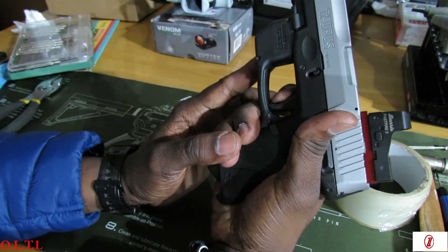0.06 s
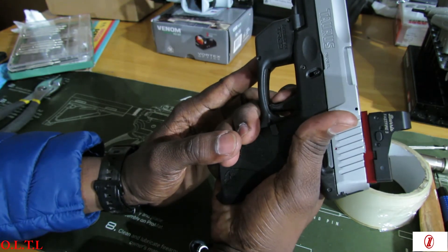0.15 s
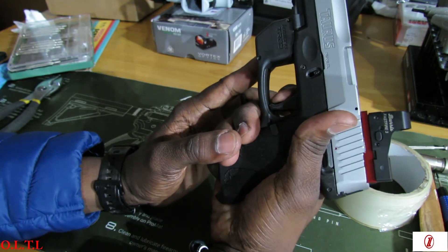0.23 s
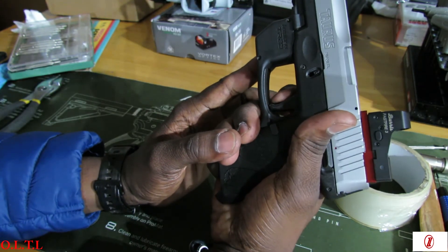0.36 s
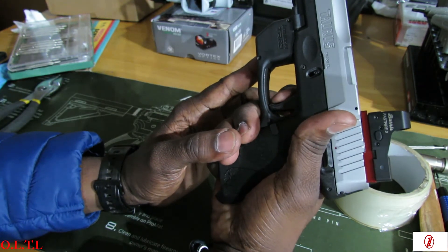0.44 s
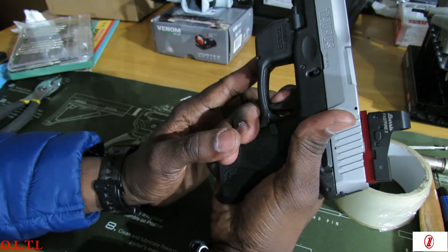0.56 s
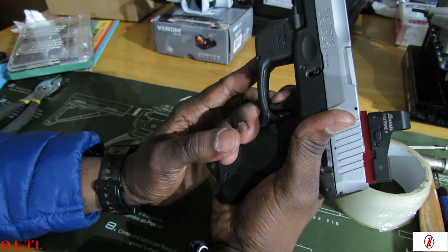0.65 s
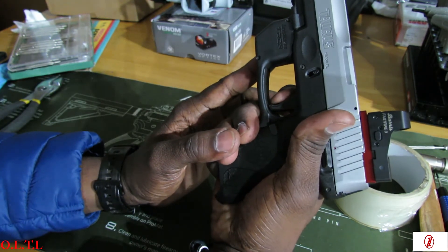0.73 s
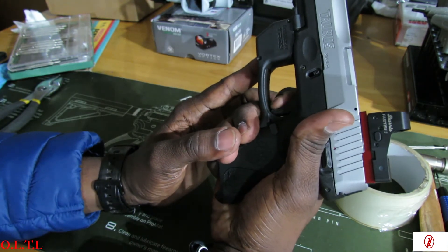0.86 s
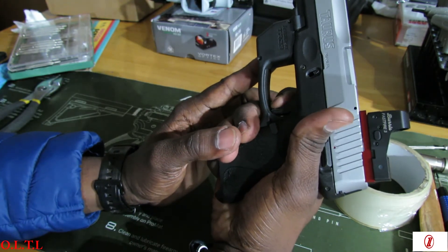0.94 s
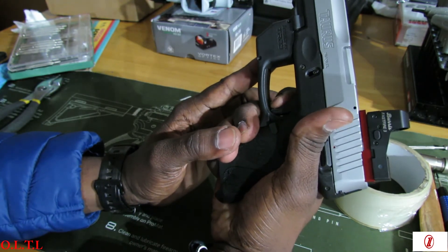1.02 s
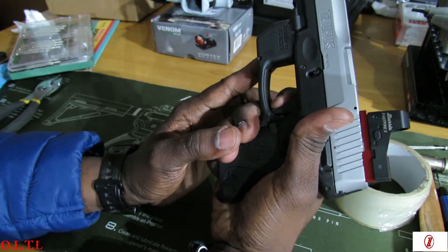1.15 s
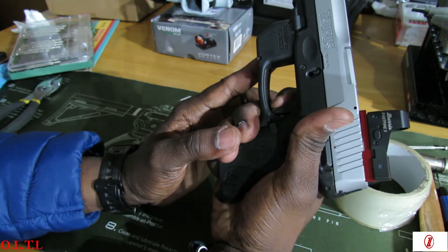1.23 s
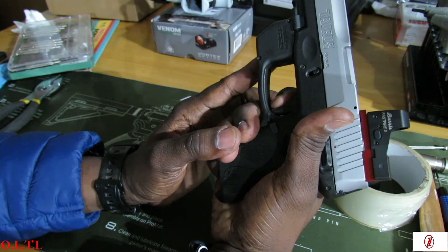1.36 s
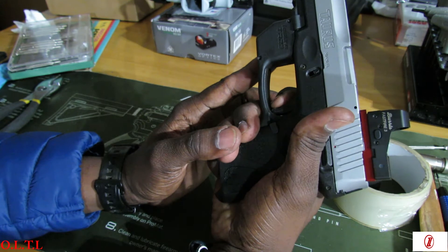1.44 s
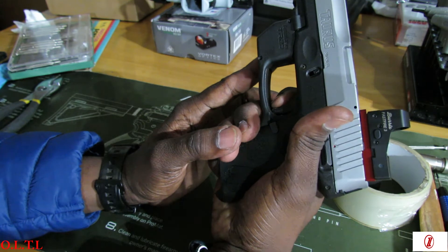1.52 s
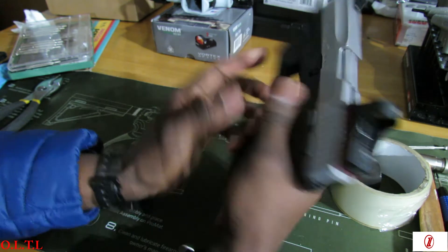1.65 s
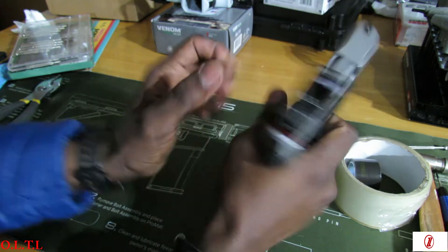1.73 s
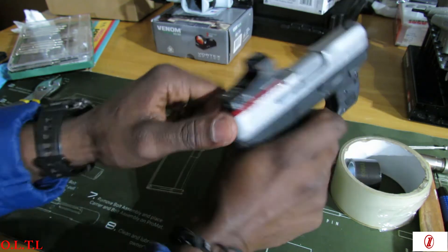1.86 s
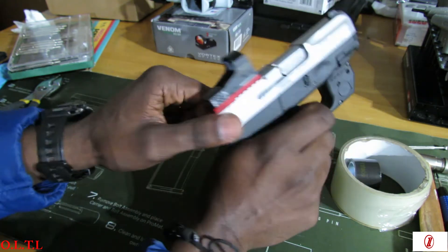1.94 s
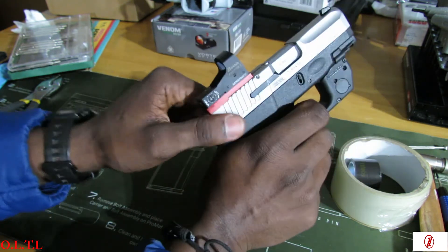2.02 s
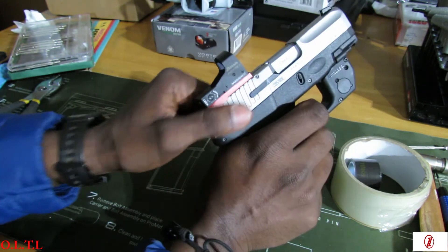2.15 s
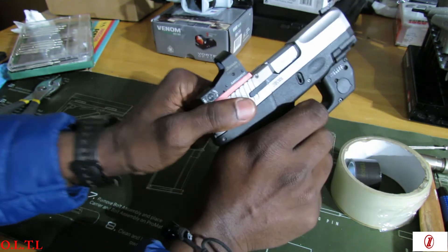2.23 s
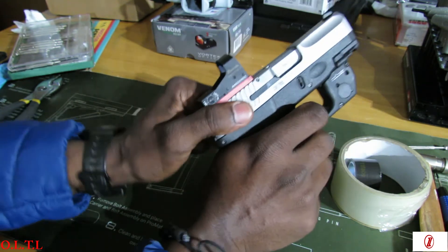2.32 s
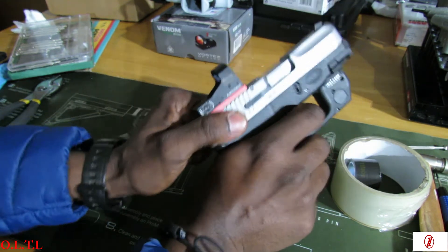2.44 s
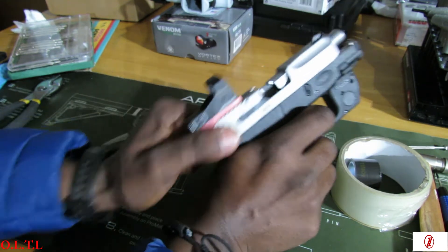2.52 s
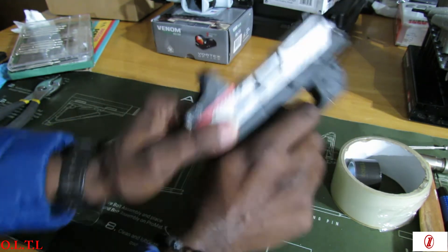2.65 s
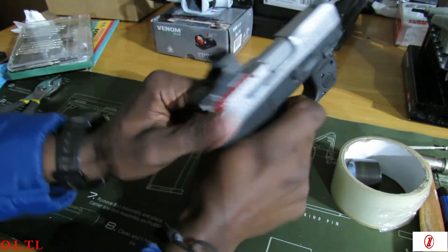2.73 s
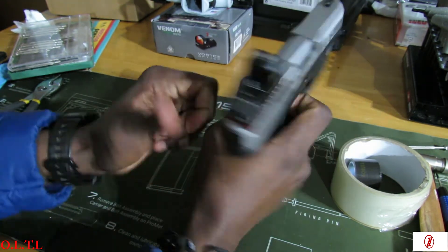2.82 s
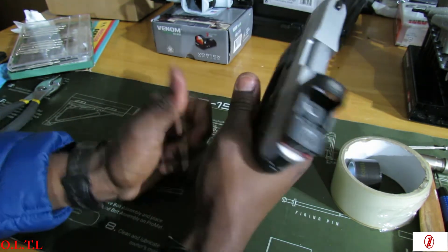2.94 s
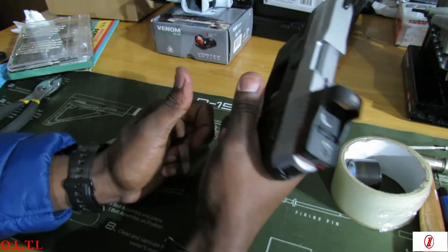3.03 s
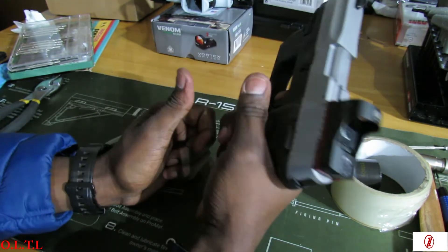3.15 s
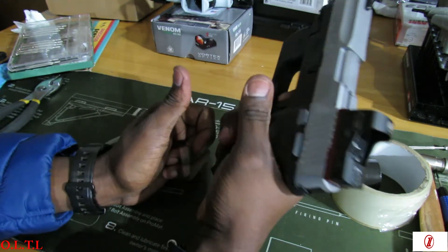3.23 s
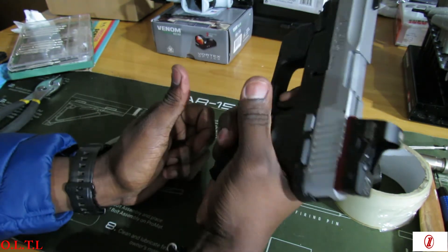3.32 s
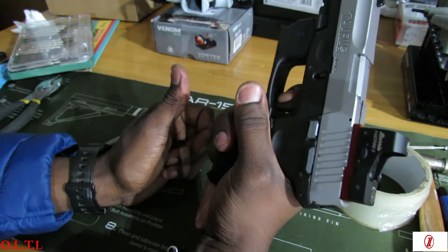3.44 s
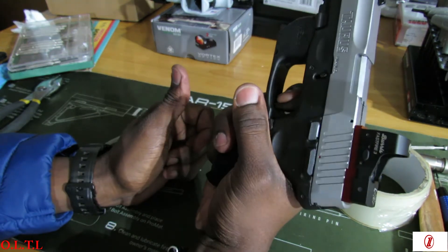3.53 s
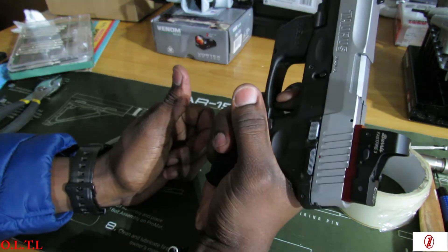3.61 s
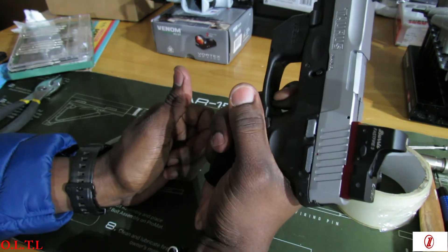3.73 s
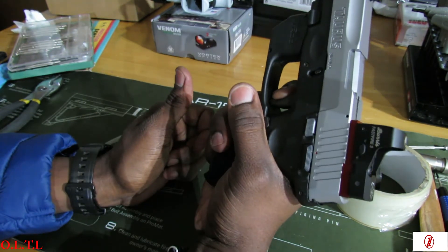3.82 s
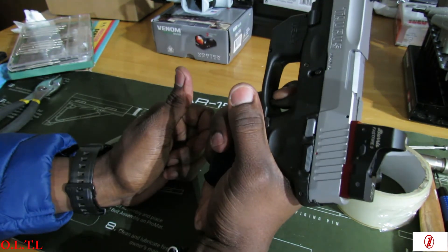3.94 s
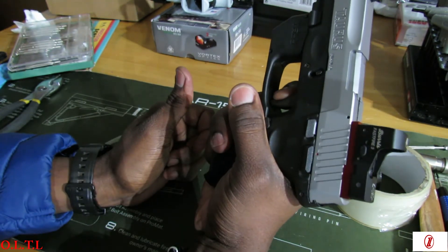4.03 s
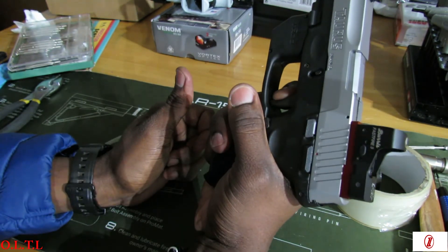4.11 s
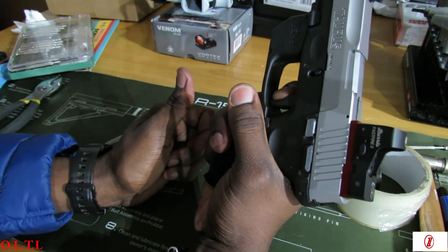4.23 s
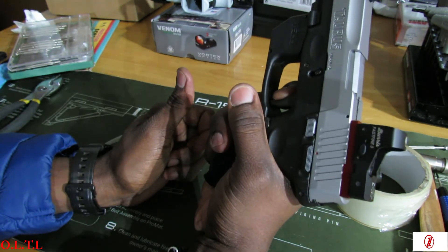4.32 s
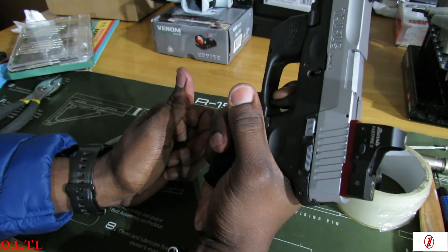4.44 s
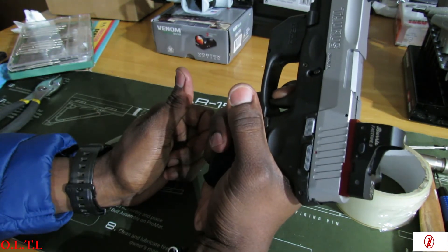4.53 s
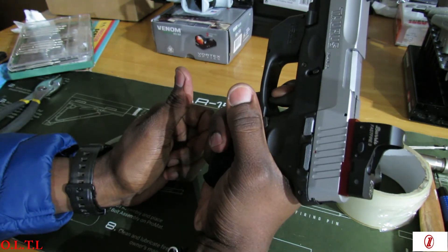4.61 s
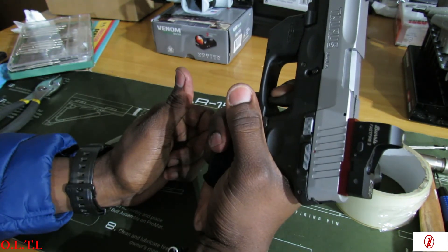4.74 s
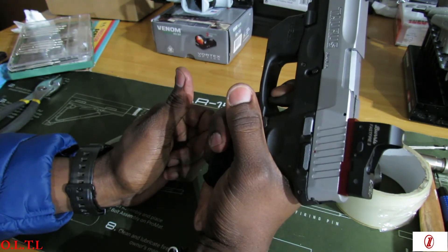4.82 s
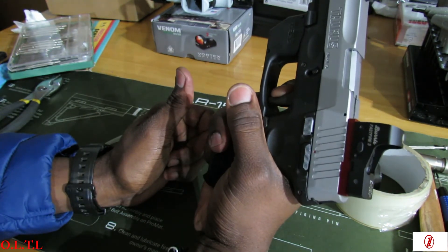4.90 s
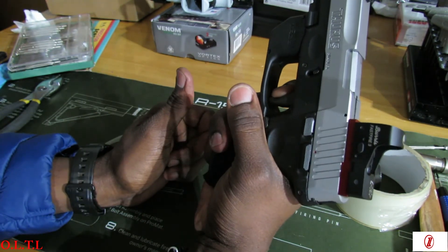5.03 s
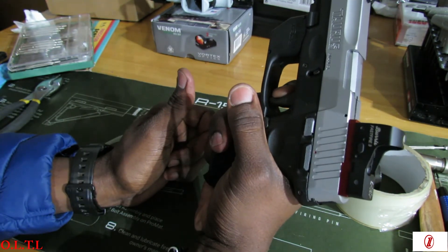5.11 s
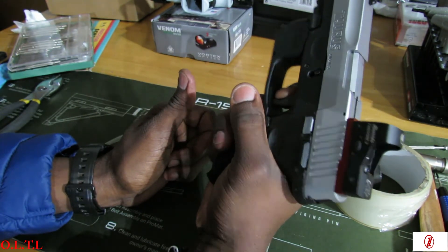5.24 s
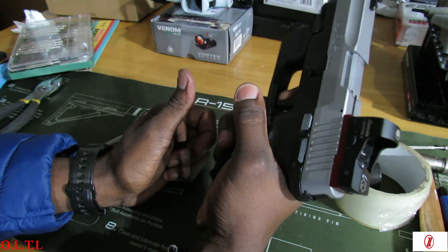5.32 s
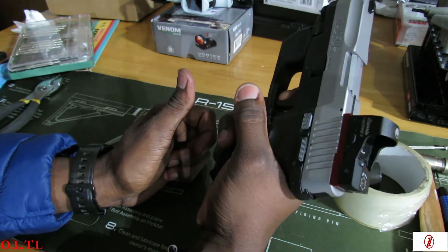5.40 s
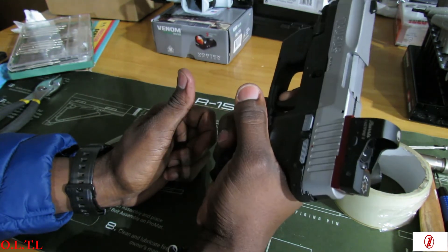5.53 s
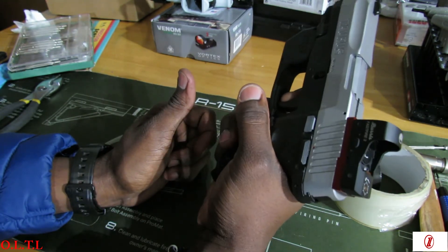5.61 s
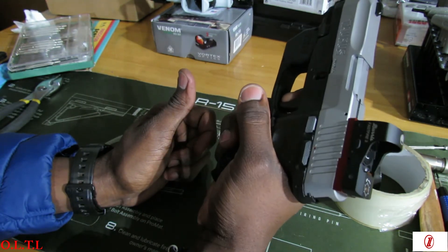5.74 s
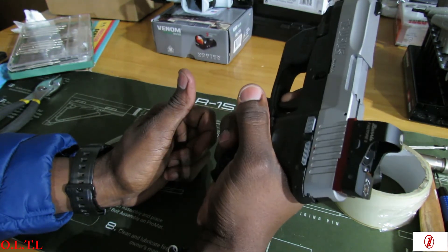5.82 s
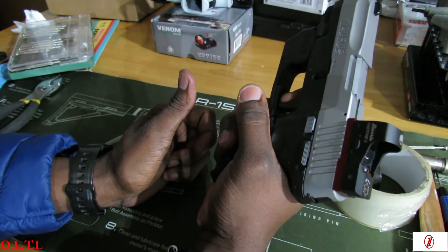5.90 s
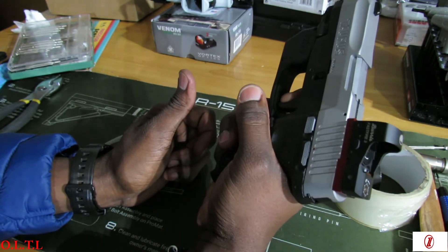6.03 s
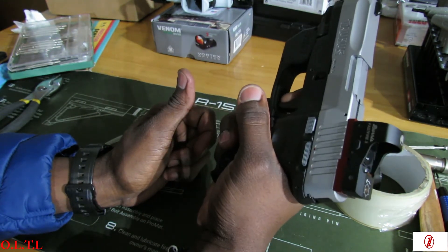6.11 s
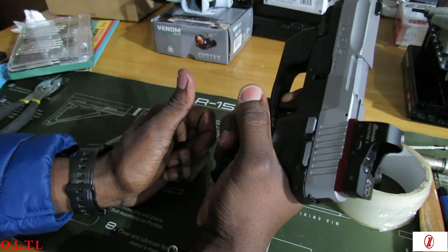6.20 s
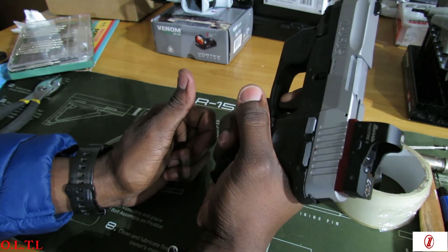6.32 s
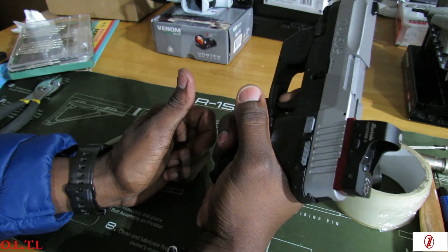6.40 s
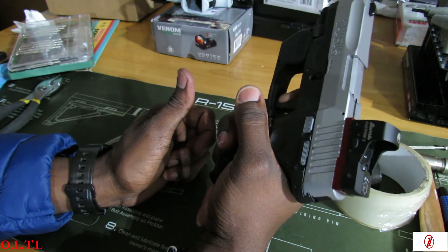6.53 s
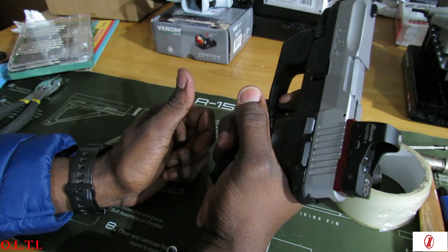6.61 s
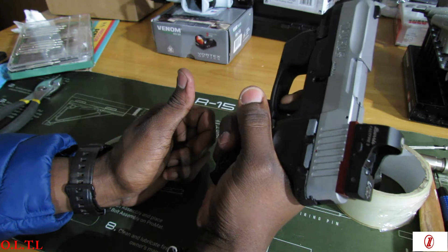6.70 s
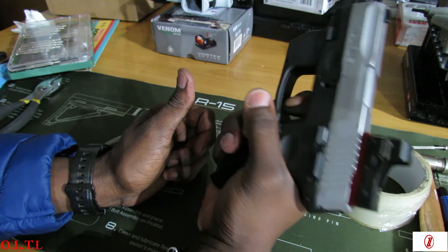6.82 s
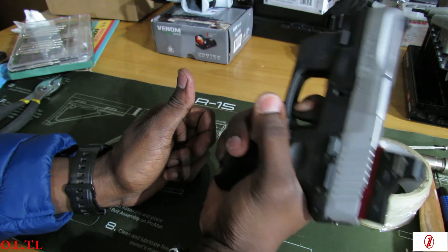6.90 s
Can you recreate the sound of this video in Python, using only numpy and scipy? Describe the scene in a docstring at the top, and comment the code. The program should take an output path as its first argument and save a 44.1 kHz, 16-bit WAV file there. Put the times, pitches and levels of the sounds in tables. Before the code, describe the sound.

In a small humming room, an unloaded pistol's trigger snaps once, hands rub the grip, the slide is racked hard, then the trigger resets.

```python
"""Over a fan's hum in a small room, an unloaded pistol is dry-fired: a faint noise leads in, the sear lets go,
then the striker lands and bounces, as noise cracks over ringing modes. Hands rub the grip (grainy friction
noise) and bump it; the slide is racked in double blows; small parts tick and tap; the trigger is let out to
its reset. Late on, a nylon sleeve sweeps past on the left and its folds snap. Room noise answers each sound.
A gain control ducks at the loud snaps and lets the room noise creep back."""
import sys
import numpy as np
from scipy import signal
from scipy.fft import rfft, irfft, next_fast_len
from scipy.io import wavfile
from scipy.ndimage import uniform_filter1d, minimum_filter1d, map_coordinates

SR = 44100
rng = np.random.default_rng(int(sys.argv[2]) if len(sys.argv) > 2 else 0)


def to_wav(sig):
    """Store sig (one row per channel, or 1-D mono) as 16-bit WAV at the path in sys.argv[1].

    Samples outside -1..1 are clipped; the rate is SR.
    """
    pcm = np.clip(np.atleast_2d(sig), -1, 1) * 32767
    pcm = np.round(pcm).astype(np.int16)
    wavfile.write(sys.argv[1], SR, pcm.T)  # frames by channels


N = 306881  # length in samples

# ringing modes of the trigger's connector: (f/Hz, relative level/dB, t60/s)
CONNECTOR_MODES = [(2240, -15, 0.052), (4200, -0.5, 0.006), (4790, 1.5, 0.012), (5350, -1, 0.007),
                   (5950, -14, 0.0091), (8860, -2, .012), (10500, 4, 0.014), (11650, 2, 0.013),
                   (12120, 1.5, 0.014)]


def amp(db):
    """Decibels to gain."""
    return 10 ** (np.asarray(db) / 20)


def unit(x):
    """Scaled to rms 1."""
    return x / np.sqrt(np.mean(x ** 2) + 1e-20)


def along(points, hz):
    """(f/Hz, value) points read on a log frequency axis."""
    f, value = np.transpose(points)
    return np.interp(np.log(hz + 1), np.log(f + 1), value)


def fade(t, t60):
    """Exponential decay by 60 dB in t60 seconds."""
    return np.exp(-np.log(1000) * t / t60)


def wobble(rate):
    """A smooth random curve with rate knots a second."""
    knots = rng.standard_normal(int(N * rate / SR) + 4)
    return map_coordinates(knots, [np.arange(N) * rate / SR])


def noise(spectrum, alike, size):
    """Coloured stereo noise of rms 1; alike lists (f/Hz, left-right likeness)."""
    hz = np.fft.rfftfreq(size, 1 / SR)
    # the likeness sets how the noise is shared between mid and side
    turn = np.arccos(np.clip(along(alike, hz), -1, 1)) / 2
    coloured = rfft(rng.standard_normal((2, size))) * amp(along(spectrum, hz))
    mid, side = irfft(coloured * [np.cos(turn), np.sin(turn)], size)
    return unit(np.array([mid + side, mid - side]))


def pan(db):
    """Left and right gains for a left-minus-right level in dB."""
    return amp([[db / 2], [-db / 2]])


def add(track, s, sound):
    """Mix a sound into the track from time s in seconds."""
    part = track[:, round(s * SR):][:, :sound.shape[1]]
    part += sound[:, :part.shape[1]]


def strokes(rows, rise):
    """Gain of rubbing strokes: each swells, rounds off and dies away exponentially; rise is the swell's share."""
    s, db, length = np.transpose(rows)[:, :, None]
    t = np.arange(N) / SR - s
    away = t / (length * np.where(t < 0, rise, 1 - rise))
    # overlapping strokes add in power
    return np.linalg.norm(amp(db) * np.exp(1 - np.hypot(1, away)), axis=0)


def rub(force, surface, grain_db, grain_rate):
    """Fine friction hiss whose strength catches and slips."""
    hiss = noise(surface, [(3000, 0.3155)], N)
    return force * unit(hiss * amp(grain_db * wobble(grain_rate)))


def ring(modes, t, scatter_db, spread):
    """Damped modes, struck at random strengths; each has a slightly different phase on either side."""
    hz, db, t60 = np.transpose(modes)[:, :, None]
    phase = rng.uniform(0, 2 * np.pi, hz.shape) + spread * rng.standard_normal((2, *hz.shape))
    strength = amp(db + scatter_db * rng.standard_normal(hz.shape)) / np.linalg.norm(amp(db))
    return np.sum(strength * fade(t, t60) * np.sin(2 * np.pi * hz * t + phase), axis=1)


def contacts(steel, times, crack_db, crack_t60, frame_db, steel_db, thud_db):
    """Steel on steel: a brief crack and, in dB re the crack, the polymer frame's knock, a steel ping and a thud."""
    # spectra of the steel's crack, the frame's knock and the thud in the hand: (f/Hz, relative level/dB)
    crack_spectrum = [(500, -25), (1500, -14), (2200, -8.5), (4000, -2), (7000, 1.5), (11000, 5),
                      (13500, -0.5), (15300, -1), (16500, -14)]
    knock_spectrum = [(600, -32), (1200, -15), (1700, -12), (2250, 0), (3200, -4.5), (3900, -10),
                      (5500, -16), (9000, -31.5)]
    thud_spectrum = [(30, -23), (170, -1.5), (350, -16), (600, -6), (1000, 3), (1700, -7), (4000, -33.5)]
    # the frame's modes that hum on: (f/Hz, relative level/dB, t60/s)
    frame_modes = [(1303, -5, 0.073), (2120, 1, 0.063), (2357, -2.5, 0.059), (2900, -4, 0.026),
                   (3180, 0, .07), (3580, -5.5, 0.1), (4790, -0.5, 0.065)]
    out, t = np.zeros((2, N)), np.arange(SR // 6) / SR
    onset = 1 - np.exp(-t / .00025)
    radiation = signal.butter(2, 1000, "highpass", fs=SR)  # small parts radiate little bass
    grip = signal.butter(2, 110, "highpass", fs=SR)  # the whole gun reaches lower
    for s, db, t60, knock_db, ping_db in np.broadcast(times, crack_db, crack_t60, frame_db, steel_db):
        crack = noise(crack_spectrum, [(3000, .85), (12000, 1.0)], len(t)) * fade(t, t60)
        # many heavily damped frame modes blur into noise, a few hum on
        knock = noise(knock_spectrum, [(2500, 0.6)], len(t)) * fade(t, t60 + 0.0041)
        knock = knock + amp(-13) * ring(frame_modes, t, scatter_db=2.5, spread=0.4)
        ping = ring(steel, t, scatter_db=2, spread=0.2)
        blow = crack + amp(knock_db) * pan(-4.5) * knock + amp(ping_db) * ping
        click = signal.lfilter(*radiation, onset * blow)
        thud = amp(thud_db) * pan(-3.5) * noise(thud_spectrum, [(500, 0.23)], len(t)) * fade(t, 0.017)
        add(out, s, amp(db) * (click + signal.lfilter(*grip, onset * thud)))
    return out


def fan():
    """Steady room air as coloured noise, with a fan's slightly unsteady hum and whine as sines."""
    # spectrum of the air: (f/Hz, relative level/dB)
    air_spectrum = [(12, -42), (20, -9), (43, -7), (123, -2), (150, -4), (228, -4), (285, -7.5),
                    (328, -4.5), (446, -7), (698, -6.5), (1120, -10.5), (1810, -14.5), (2390, -17.5),
                    (13900, -29.5), (16000, -35.5)]
    # stereo width of the air: (f/Hz, left-right likeness from -1 to 1)
    air_alike = [(60, 0.22), (150, -0.03), (380, -0.56), (950, -0.46), (2380, -0.21), (5980, 0.04),
                 (15000, -0.0013)]
    # the fan's hum and whine: (mean f/Hz, mean level/dB)
    tones = [(119, -72), (838, -71.5)]
    out = amp(-54) * noise(air_spectrum, air_alike, N)
    for hz, db in tones:
        phase = 2 * np.pi * np.cumsum(hz + 4 * wobble(12)) / SR
        out = out + amp(db + 2 * wobble(3.3)) * np.sin(phase)
    return out


def room(x, near_db, near_t60, tail_db):
    """The bench and its clutter answer from 2 ms on; the walls leave a longer diffuse tail that builds up."""
    # decay of the tail: (f/Hz, t60/s)
    tail_decay = [(150, .25), (1000, 0.66), (3200, 0.53), (6000, .45), (10000, 0.31), (15000, 0.26)]
    # colour of the tail: (f/Hz, relative level/dB)
    tail_colour = [(100, -7.5), (1000, -5), (2400, -3), (4500, 3), (9000, -2.5), (15000, -3.5)]
    hz, s, z = signal.stft(rng.standard_normal((2, SR * 2 // 3)), SR, nperseg=256)
    shape = amp(along(tail_colour, hz))[:, None] * fade(s, along(tail_decay, hz)[:, None])
    tail = signal.istft(z * shape, SR, nperseg=256)[1]
    t = np.arange(tail.shape[1]) / SR
    tail = tail * (1 - np.exp(-t / 0.0088))
    near = rng.standard_normal(tail.shape) * fade(t, near_t60) * (t > .002)
    near = amp(near_db) * near / np.linalg.norm(near[0])
    tail = amp(tail_db) * tail / np.linalg.norm(tail[0])
    return signal.fftconvolve(x, near + tail, axes=1)[:, :N]


def sleeve():
    """The nylon sleeve slides by on the left as grainy hiss, and its folds snap as short noise bursts."""
    # spectrum of nylon on nylon: (f/Hz, relative level/dB)
    nylon_spectrum = [(150, -34), (400, -7), (900, -2.5), (2200, -4), (4000, -1), (7200, 0.5), (9500, -5),
                      (14500, -3), (16000, -5)]
    # sweeps of the sleeve: (t of the peak/s, relative level/dB, time scale/s)
    sweeps = [(6.255, -43, 0.18), (6.78, -60, 0.23)]
    # snaps of the folds: (t/s, relative level/dB)
    creases = [(5.9864, -42), (6.0768, -39), (6.3007, -26), (6.5405, -32.5)]
    out = amp(2.0) * rub(strokes(sweeps, rise=0.35), nylon_spectrum, grain_db=1.5, grain_rate=400)
    t = np.arange(SR // 20) / SR
    for s, db in creases:
        snap = noise(nylon_spectrum, [(3000, 0.38)], len(t)) * fade(t, 0.011)
        add(out, s, amp(db - 6.5) * snap)
    return pan(7.8) * out


def hands():
    """Palms rub round the grip as friction hiss and bump softly against it as low noise with a pitch."""
    # spectrum of skin on the grip: (f/Hz, relative level/dB)
    skin_spectrum = [(100, -7), (300, 3.5), (900, 3), (2200, 2.5), (4000, 0.5), (8000, -2), (12000, -5.5),
                     (16000, -6)]
    # strokes on the grip: (t of the peak/s, level/dB, time scale/s)
    grip_strokes = [(1.78, -40, 0.13), (1.98, -48.5, 0.17), (2.21, -47.5, 0.12), (2.45, -47, 0.25),
                    (2.9, -51, 0.38), (3.3, -56, 0.11), (3.62, -56, 0.15), (4.44, -60, 0.052)]
    # soft knocks of the hands: (t/s, pitch f/Hz, level/dB, t60/s)
    bumps = [(1.750, 312, -30.5, 0.039), (2.967, 130, -35.5, 0.13), (6.9, 150.7, -50.5, 0.26),
             (6.939, 162, -47.5, 0.11)]
    # spectrum of a bump: (multiple of its pitch, relative level/dB)
    bump_spectrum = [(.2, -29), (1, 2), (2, -22.5), (5, -21), (15, -19), (60, -56)]
    force = strokes(grip_strokes, rise=.42)
    out = pan(2.0) * rub(force, skin_spectrum, grain_db=1.5, grain_rate=300)
    t = np.arange(SR // 4) / SR
    soft_onset = 1 - np.exp(-t / 0.0019)
    for s, hz, db, t60 in bumps:
        body = noise(np.array(bump_spectrum) * [hz, 1], [(200, 1.0)], len(t))
        add(out, s, amp(db) * body * fade(t, t60) * soft_onset)
    return out


def small_parts():
    """Bright ticks of the linkage and dull taps of loose parts on the frame as the gun is handled."""
    # thin ticks of the trigger's linkage: (t/s, crack level/dB)
    tick_rows = [(3.5779, -38.5), (3.6157, -35.5), (3.712, -52), (4.3955, -43.5), (4.4560, -37),
                 (4.5800, -35)]
    # loose parts tap the frame: (t/s, crack level/dB, crack t60/s)
    tap_rows = [(.5337, -64.5, .032), (1.6127, -48.5, 0.041), (2.969, -48, 0.016), (3.3114, -50, .035),
                (3.596, -59.5, .12), (5.2883, -57, 0.014)]
    ticks = contacts(CONNECTOR_MODES, *np.transpose(tick_rows),
                     crack_t60=.008, frame_db=-23, steel_db=-15, thud_db=-24)
    taps = contacts(CONNECTOR_MODES, *np.transpose(tap_rows), frame_db=11.0, steel_db=-7.5, thud_db=-8)
    return ticks + taps


def reset():
    """The connector snaps back and rings; the trigger bar follows with a duller knock on the frame."""
    reset_s, bar_lag_s = 4.6522, .0116
    snap = contacts(CONNECTOR_MODES, reset_s, crack_db=0.5,
                    crack_t60=0.0087, frame_db=-18, steel_db=-1.5, thud_db=-40)
    bar = contacts(CONNECTOR_MODES, reset_s + bar_lag_s, crack_db=-23,
                   crack_t60=0.02, frame_db=1.5, steel_db=-5.5, thud_db=-29.5)
    return snap + bar


def rack():
    """The slide unlocks, hits its rear stop, is let go and slams shut; play in the rails doubles every blow."""
    # blows: (t/s, crack level/dB, then re the crack: second contact level/dB, frame level/dB, spring level/dB)
    blows = [(2.4498, -24.5, -2, 5, -18.5), (2.4673, 20, -19.5, -10.5, -26), (2.497, 6, 2, 1, 2.5),
             (2.5310, 11.5, -17, -9.5, -21), (2.665, -7, 0, -5.5, 2), (2.6858, 2.5, 14.5, -10.5, 3),
             (2.6929, 20.5, -8.5, -12, 3), (2.712, 11, 0, -12, -7)]
    # ringing modes of the spring: (f/Hz, relative level/dB, t60/s)
    spring_modes = [(7980, -8.5, 0.029), (8780, -2.5, 0.031), (8930, 2, 0.041), (9370, -4, 0.019),
                    (9000, -4.5, 0.024)]
    let_go_s, play_s = 2.6, .0037
    first_touch_db = -8  # the first touch rings the spring less
    s, db, second_db, frame_db, spring_db = np.transpose(blows)
    # dry cracks while the slide is drawn back, longer grinding ones as it runs home
    t60 = np.where(s < let_go_s, 0.012, .018)
    first = contacts(spring_modes, s, db, t60, frame_db, spring_db + first_touch_db, thud_db=-29.5)
    second = contacts(spring_modes, s + play_s, db + second_db, t60, frame_db, spring_db, thud_db=-24)
    return first + second


def dry_fire(count=4):
    """The sear's release knocks the frame; the striker lands and bounces ever faster and weaker."""
    # ringing modes of the striker: (f/Hz, relative level/dB, t60/s)
    striker_modes = [(3190, -16.5, .06), (7700, -4, 0.014), (8525, -2, .016), (8600, -6, .012),
                     (9860, -2.5, 0.016), (10440, 0, .014), (11200, -1.5, 0.012), (11460, -0.5, 0.026),
                     (12100, -0.5, 0.019), (12320, 0, .012), (13760, -4.5, .01)]
    lead_in_s, sear_s, strike_s = .8472, .8503, .8532
    first_flight_s, flight_shrink, bounce_loss_db = .006, .9, 6  # each flight is 0.9 of the one before
    landing = np.arange(count)
    times = strike_s + first_flight_s * np.r_[0, np.cumsum(flight_shrink ** landing[:-1])]
    # a faint noise leads in
    faint_lead_in = contacts(striker_modes, lead_in_s, crack_db=-10,
                             crack_t60=0.031, frame_db=-0.5, steel_db=-20, thud_db=-5)
    sear = contacts(striker_modes, sear_s, crack_db=19.5,
                    crack_t60=.008, frame_db=-5.5, steel_db=-8, thud_db=-16.5)
    strike = contacts(striker_modes, times, crack_db=23 - bounce_loss_db * landing,
                      crack_t60=.0105, frame_db=-14.5, steel_db=1, thud_db=-21.5)
    return faint_lead_in + sear + strike


def pistol():
    """All the gun's contacts together; they arrive one sample later on the left."""
    left, right = dry_fire() + rack() + reset() + small_parts()
    return np.array([np.roll(left, 1), right])


def scene():
    """Pistol, hands and sleeve in the room, over the fan."""
    cloth = hands() + sleeve()
    # the gun's other faces radiate the same blows to the walls with another mix of modes
    outward = (pistol() + pistol()[::-1]) / np.sqrt(2) + cloth
    answer = room(outward, near_db=-9.5, near_t60=.06, tail_db=-18.0)
    return pistol() + cloth + answer + fan()


def gain_control(x, limit_db, release):
    """Looks a few ms ahead, ducks at once by the excess over the limit, and recovers slowly."""
    power = np.abs(uniform_filter1d(np.mean(x ** 2, axis=0), size=88))
    excess = np.maximum(10 * np.log10(power + 1e-12) - limit_db, 0)
    ahead = -minimum_filter1d(-excess, size=300)
    # the running maximum holds the duck, which shrinks in dB with time constant release (s)
    recovery = np.exp(-np.arange(N) / SR / release)
    duck_db = np.maximum.accumulate(ahead / recovery) * recovery
    return x * amp(-uniform_filter1d(duck_db, size=100))


def peak_limiter(x):
    """A very fast second stage turns down the remaining spikes that pass full scale."""
    needed = 1 / np.maximum(np.abs(x).max(axis=0), 1)
    return x * uniform_filter1d(minimum_filter1d(needed, size=13), size=13)


def record(dry):
    """Gain control, peak limiting and a steep treble cut-off."""
    loud = peak_limiter(gain_control(dry, limit_db=-7.0, release=1.176))
    size = next_fast_len(N + SR // 2)
    top_hz = 16050
    band = 1 / (1 + (np.fft.rfftfreq(size, 1 / SR) / top_hz) ** 110)
    return irfft(rfft(loud, size) * band, size)[:, :N]


dry = scene()
out = record(dry)
to_wav(out)
```